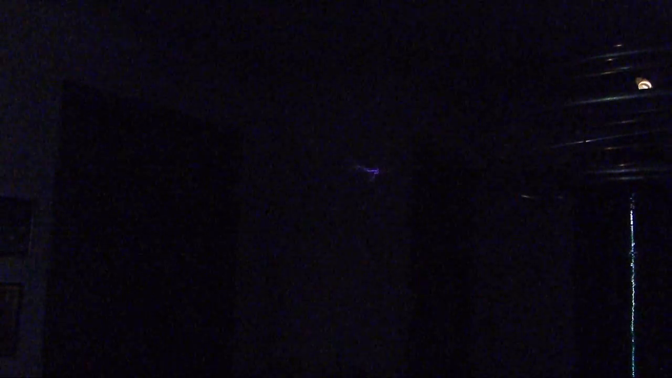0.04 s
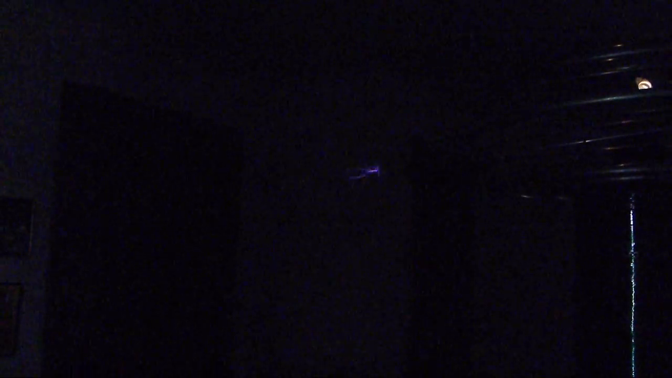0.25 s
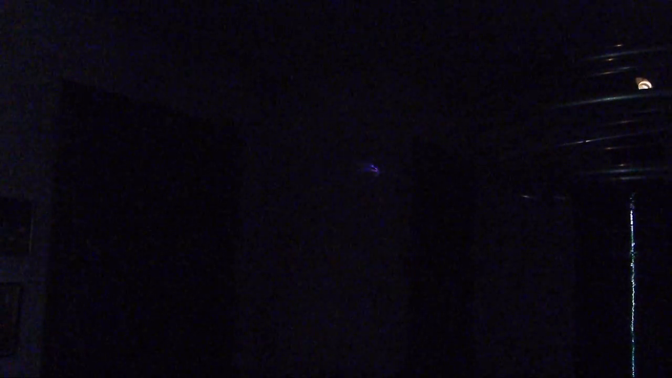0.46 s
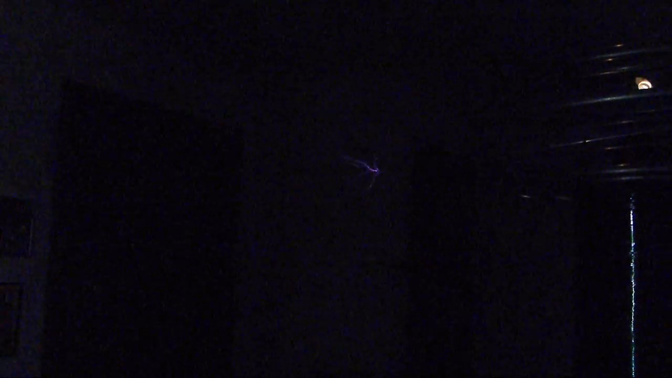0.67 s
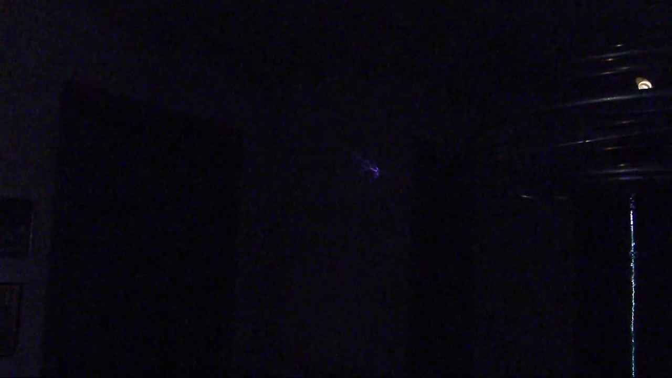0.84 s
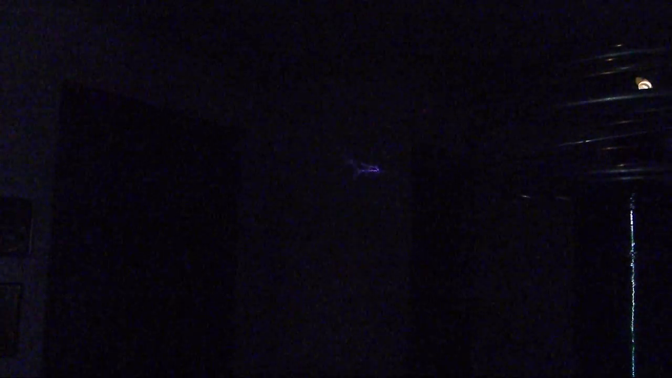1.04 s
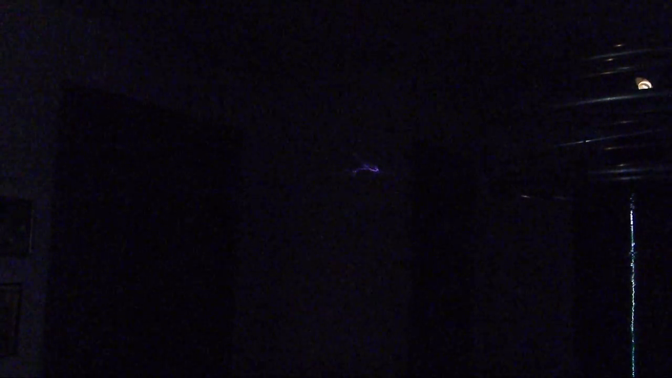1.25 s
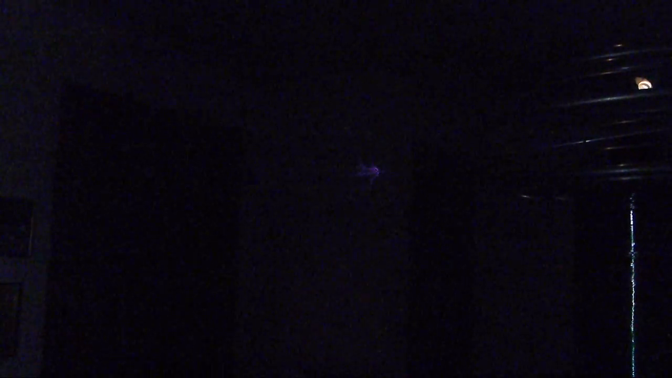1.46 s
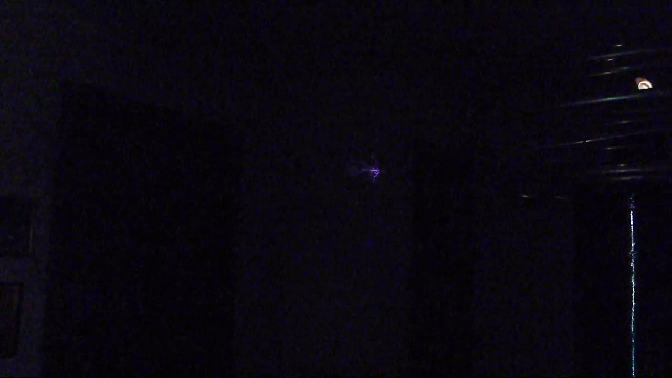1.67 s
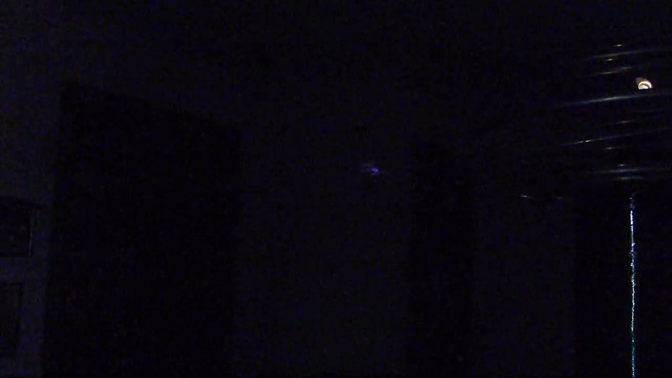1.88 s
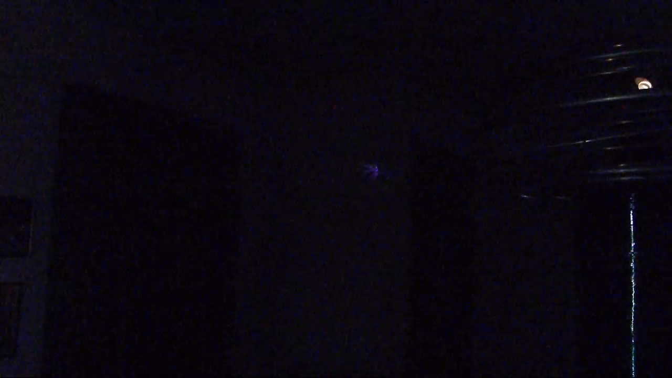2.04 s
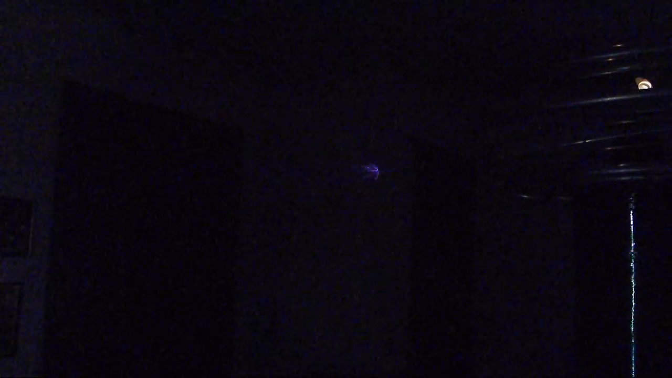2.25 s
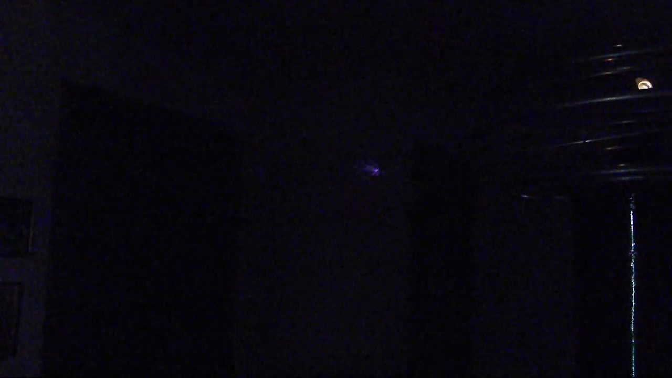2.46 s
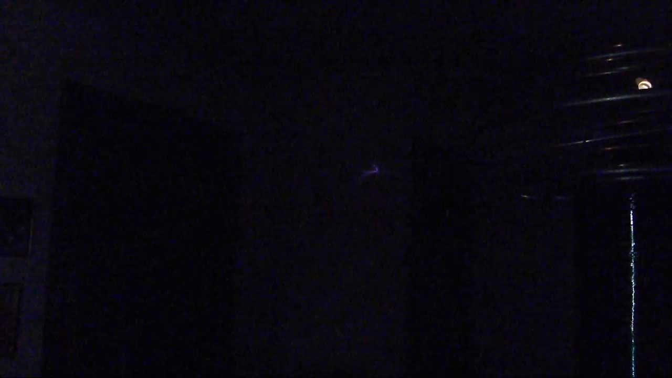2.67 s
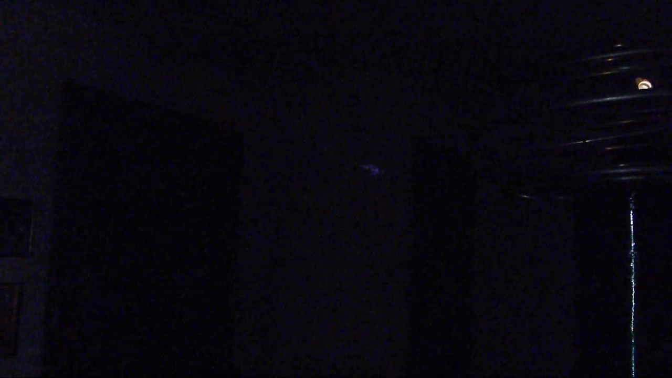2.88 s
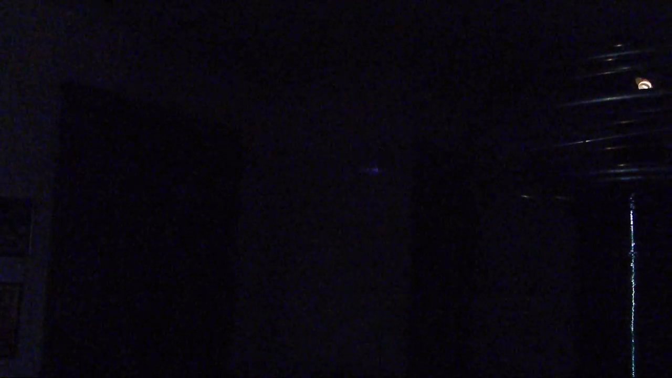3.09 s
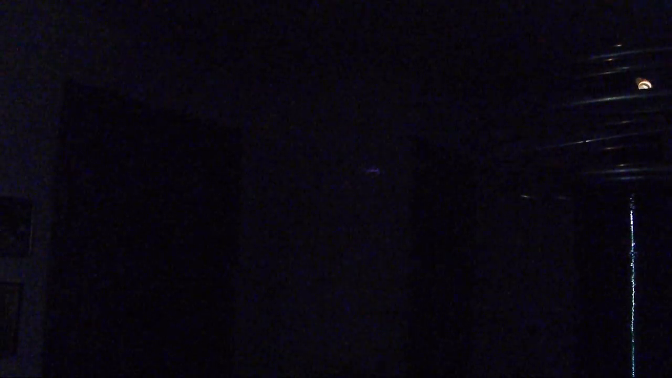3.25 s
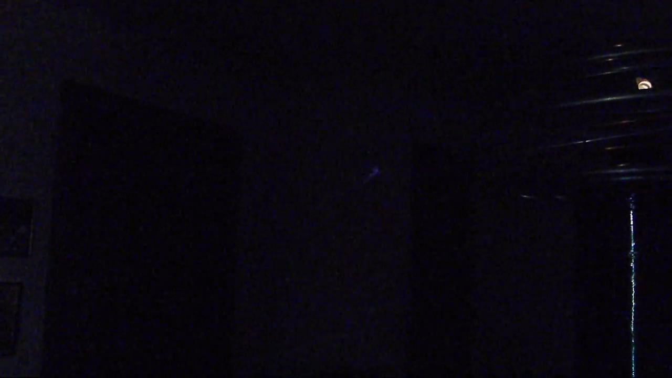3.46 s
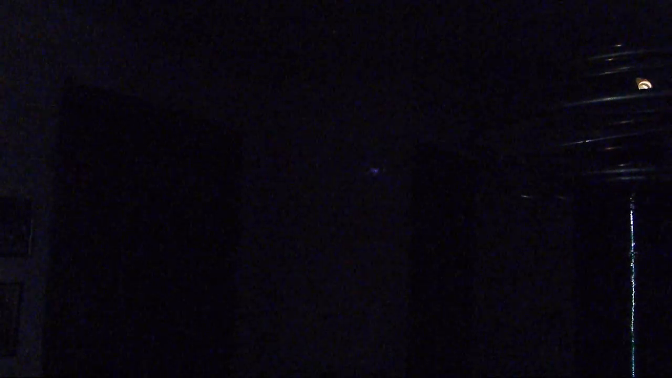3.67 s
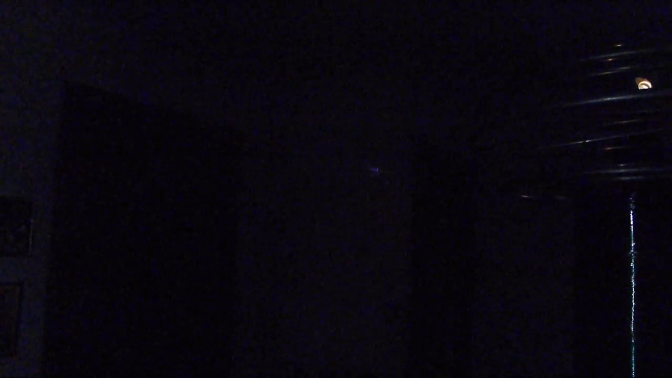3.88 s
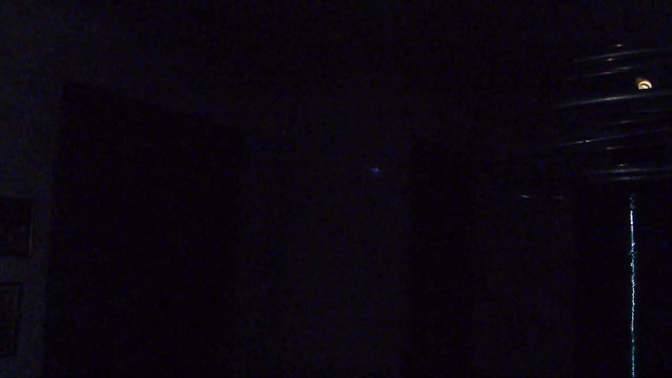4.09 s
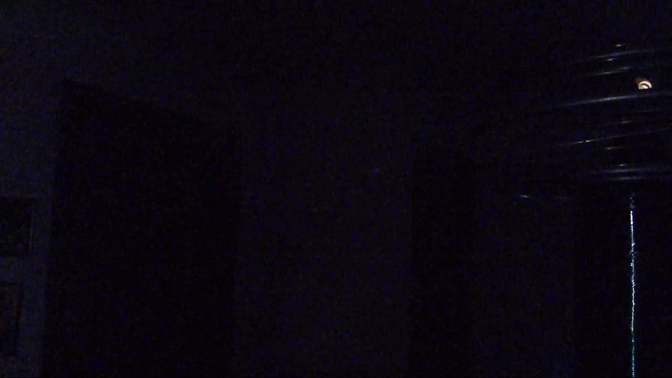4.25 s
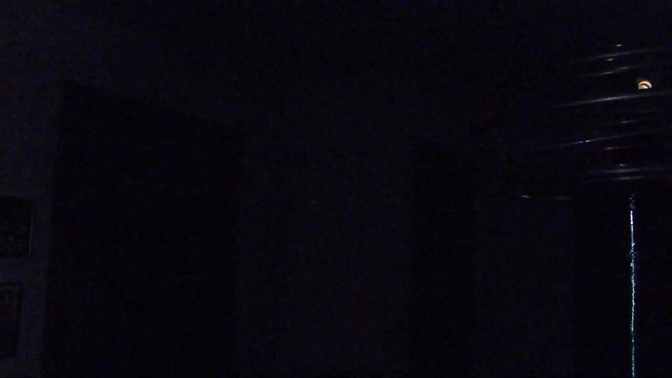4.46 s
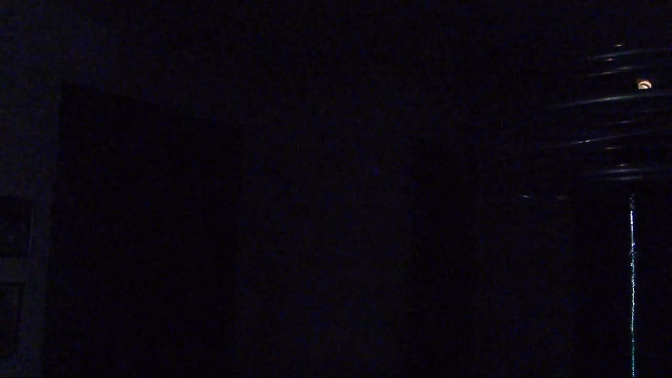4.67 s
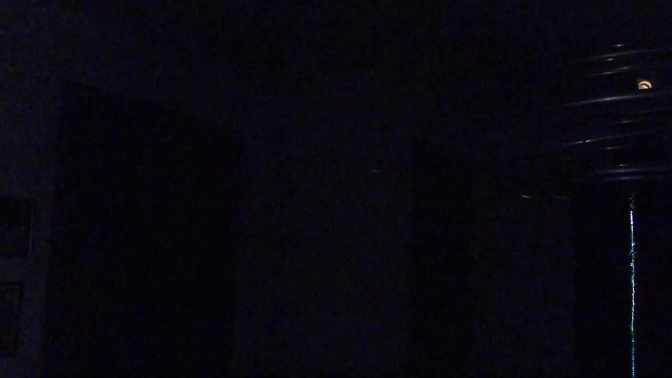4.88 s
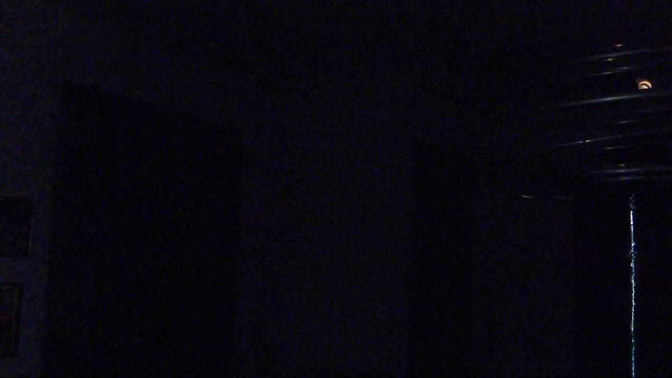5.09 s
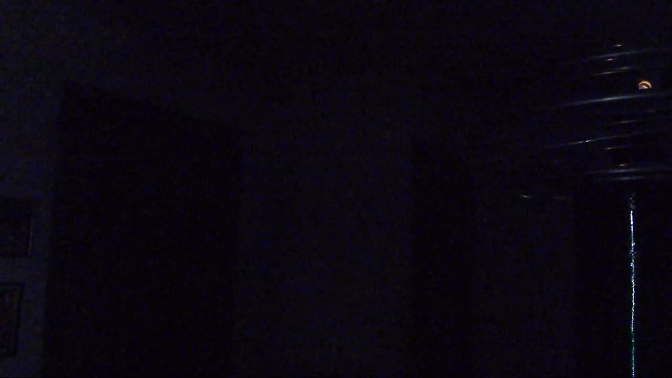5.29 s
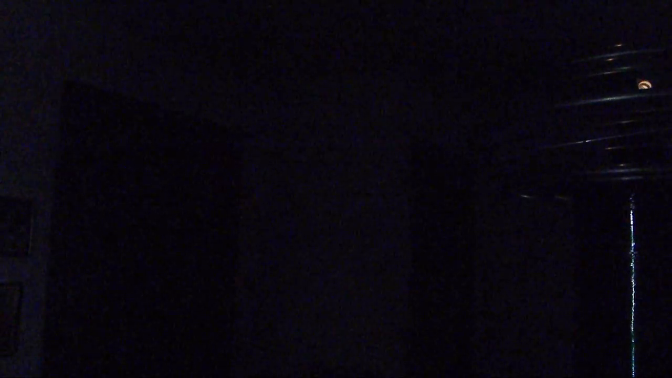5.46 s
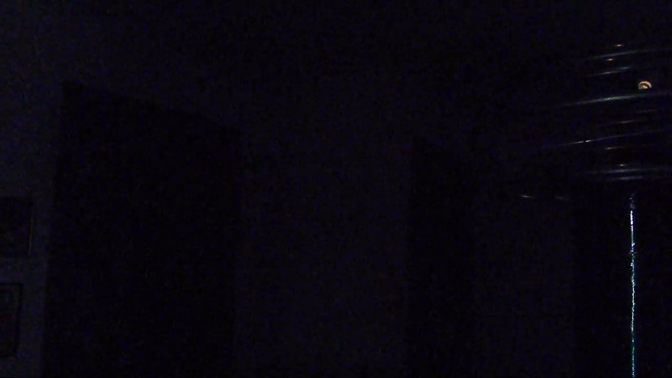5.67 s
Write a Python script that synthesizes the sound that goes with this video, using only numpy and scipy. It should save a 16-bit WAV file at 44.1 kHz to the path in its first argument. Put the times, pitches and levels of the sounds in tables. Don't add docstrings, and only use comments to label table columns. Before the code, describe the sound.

Continuous electric arcing buzz, dry and crackly, with a steady low rattling pitch. Loudness wavers for three seconds, loses some body, swells briefly, then falls away around 4.1 seconds; by five only faint ticking and irregular spark catches remain. Soft air noise and slight hum lie beneath. Indoors, hard walls, a small camera microphone with a thin, midrange-heavy sound.

```python
import sys
import numpy as np
from scipy import signal
from scipy.fft import rfft, irfft, next_fast_len
from scipy.io import wavfile
from scipy.ndimage import uniform_filter1d

SR = 44100
rng = np.random.default_rng(int(sys.argv[2]) if len(sys.argv) > 2 else 0)


def boost(x):
    u = np.asarray(x, float) / 20
    return 10 ** u


def dump(signal):
    limited = np.clip(np.atleast_2d(signal).T, -1, 1)
    pcm = np.round(limited * 32767).astype(np.int16)
    wavfile.write(sys.argv[1], SR, pcm)


N = 252693
SIZE = next_fast_len(N + SR)
FIRING_HZ = 68.64116


def firings():
    creep_hz_per_s, first_s = .003665, .009
    count = np.arange(-1, int(N / SR * FIRING_HZ) + 2)
    rate = np.sqrt(FIRING_HZ ** 2 + 2 * creep_hz_per_s * count)
    return (rate - FIRING_HZ) / creep_hz_per_s + first_s


def thump(train, knee_hz, damping_hz, suction_ms):
    rise_hz, suction = 592, .455
    standing_width_hz = 90
    # t/ms, level/dB
    echoes = [(0.663, 0.5), (2.149, 4.03), (2.91, -5.5), (3.814, 0.5), (4.197, -4.5), (5.072, -6.5),
              (5.372, -1.5), (6.148, 1.5), (6.686, -4), (7.805, -6.5), (8.684, 0), (11.706, 0),
              (12.558, -3), (14.149, -6.5)]
    # f/Hz, level/dB
    standing = [(412, -2), (471, 7.5), (549, 8), (602, -20), (675, 10.5), (765, -2), (892, 3), (1536, -15),
                (1613, 8), (2681, 9), (2986, 12), (3260, 15), (3586, 14), (3798, 1)]
    echo_paths = [(ms, boost(db)) for ms, db in echoes]
    modes = [(hz, standing_width_hz, db) for hz, db in standing]

    def response(s):
        expansion = s / (s + rise_hz) / (s * s + s * damping_hz + knee_hz ** 2)
        pulse = expansion * paths(s, [(0, 1), (suction_ms, -suction)])
        room = paths(s, echo_paths) * peaks(s, modes)
        return pulse * room * lead(s)

    return microphone(through(train, response))


def crackle(times, spark_db, column, spectrum, burst_ms, spread_db, room_db, t60, wall_hz):
    # t/ms, low level/dB, high level/dB
    arrivals = np.array([(.25, -21, -3), (2.15, 6, 2), (3.9, 5, 5.5), (6.1, -1.5, -12), (7.8, -15, -27),
                         (8.7, -4, -28), (11.2, -7, -23), (11.8, 3, -5), (12.8, 6, -30)])
    age = np.arange(48)
    delays = arrivals[:, 0] / 1000
    at = ((times[:, None] + delays + 1 / FIRING_HZ) * SR).astype(int)
    scatter_db = spread_db * rng.standard_normal(at.shape)
    sizes = boost(arrivals[:, column] + spark_db[:, None] + scatter_db)

    envelope = age * np.exp(-age / (burst_ms * SR / 1000))
    shape = envelope * rng.standard_normal(at.shape + age.shape)
    shape /= np.linalg.norm(shape, axis=2, keepdims=True)
    bursts = np.zeros(SIZE)
    np.add.at(bursts, at[..., None] + age, sizes[..., None] * shape)

    tail_samples = SR // 2
    decay = boost(-60 * np.arange(tail_samples) / SR / t60)
    tail = rng.standard_normal(tail_samples) * decay
    tail_response = boost(room_db) * rfft(tail / np.linalg.norm(tail), SIZE)

    def response(s):
        room = 1 + tail_response * wall_hz / (s + wall_hz)
        return at_hz(spectrum, s.imag) * room * lead(s)

    return through(bursts, response)


def stages(t):
    # t/s, low crackle level/dB and high crackle level/dB re thump, strength scatter/dB, shrinkage 0-1
    streamer = [
        (0, -0.5, -5, -1.3, 0.14),
        (.44, -4.5, -7.5, 0.4, 0),
        (2.85, -11.5, -7, -0.6, 0.6),
        (4.12, -21, -8, -0.7, 1),
        (5.03, -15.5, -4, -0.8, 0.82),
    ]
    half_turn_s = 0.032
    rows = np.array(streamer)
    share = np.clip((t[:, None] - rows[1:, 0]) / (2 * half_turn_s) + .5, 0, 1)
    return (rows[0, 1:] + share @ np.diff(rows[:, 1:], axis=0)).T


def extra_db(times, events):
    out = np.zeros(len(times))
    nearest = [np.argmin(abs(times - s)) for s, db in events]
    out[nearest] = [db for s, db in events]
    return out


def see_saw(count):
    return np.diff(rng.standard_normal(count + 1)) / np.sqrt(2)


def tick(times):
    # f/Hz, width/Hz, level/dB
    coil_rings = [(8700, 3900, 4.5), (5380, 2300, -21.5), (7230, 940, 10), (11650, 4700, 7),
                  (14500, 2600, -2), (8570, 390, 4)]

    def response(s):
        body = s * s / (s * s + s * 6600 + 4700 ** 2) / (s * s + s * 9000 + 6500 ** 2)
        return body * peaks(s, coil_rings) * paths(s, tick_paths()) * lead(s)

    return through(clicks(times, np.ones(len(times))), response)


def tick_paths():
    # t/ms, level/dB
    tick_arrivals = [(.3, -11), (2.2, -4), (3.9, -5), (11.8, -15)]
    spread_ms, scatter_db = 0.735, -1.5
    clusters = [(ms + spread_ms * rng.random(), boost(db) * rng.normal())
                for ms, db in tick_arrivals for part in range(9)]
    period_ms = 1000 / FIRING_HZ
    scatter = [(period_ms * rng.random(), boost(scatter_db) * rng.normal()) for path in range(30)]
    return clusters + scatter


def whine(times):
    hz, width_hz, level_db = 9200, 40, -45
    ring = lambda s: s / (s * s + s * width_hz + hz ** 2) * lead(s)
    return boost(level_db) * rms_one(through(clicks(times, np.ones(len(times))), ring))


def room_tone():
    # f/Hz, level/dB
    air_spectrum = [(25, -10.5), (70, -7), (120, -3.5), (200, -9), (400, -14.5), (1500, -12.5), (5500, -20),
                    (16000, -40)]
    # f/Hz, level/dB
    hum_lines = [(118.4, -73)]
    air_db, hum_trim_db = -54, -2.0
    t = np.arange(N) / SR
    air = rms_one(through(rng.standard_normal(N), lambda s: at_hz(air_spectrum, s.imag)))
    hum = sum(boost(db + hum_trim_db) * np.sin(2 * np.pi * hz * t) for hz, db in hum_lines)
    return boost(air_db) * air + hum


def microphone(x):
    # f/Hz, width/Hz, level/dB
    housing = [(4040, 180, -10.5), (6220, 1040, -17), (7800, 370, -12.5), (10180, 250, -14)]

    def response(s):
        first_bass_cut = (s * s / (s * s + s * 130 + 262 ** 2)) ** 2
        second_bass_cut = s * s / (s * s + s * 300 + 240 ** 2)
        return first_bass_cut * second_bass_cut * peaks(s, housing)

    return rms_one(through(x, response))


def clicks(times, sizes):
    at = (times + 1 / FIRING_HZ) * SR
    taps = np.floor(at)[:, None] + np.arange(-16, 17)
    offset = taps - at[:, None]
    window = np.cos(np.pi * offset / 34) ** 2
    out = np.zeros(SIZE)
    np.add.at(out, taps.astype(int), sizes[:, None] * np.sinc(offset) * window)
    return out


def lead(s):
    return np.exp(2 * np.pi * s / FIRING_HZ)


def paths(s, table):
    return sum(gain * np.exp(-2 * np.pi * s * ms / 1000) for ms, gain in table)


def peak(s, hz, width_hz, db):
    above = s * s + s * width_hz * boost(db / 2) + hz * hz
    below = s * s + s * width_hz / boost(db / 2) + hz * hz
    return above / below


def peaks(s, table):
    return np.prod([peak(s, *row) for row in table], axis=0)


def at_hz(points, hz):
    table = np.array(points)
    return boost(np.interp(np.log(hz), np.log(table[:, 0]), table[:, 1]))


def through(x, response):
    hz = np.arange(SIZE // 2 + 1) * SR / SIZE + 1e-3
    return irfft(rfft(x, SIZE) * response(1j * hz), SIZE)[:N]


def rms_one(x):
    return x / np.sqrt(np.mean(x ** 2) + 1e-20)


def scene():
    # t/s, level/dB
    drive = [(0, -25.5), (.2, -28), (.42, -28), (.45, -29.5), (.53, -27.5), (.56, -27.5), (1.2, -26),
             (1.75, -26.5), (2.38, -25.5), (2.45, -27), (2.73, -26), (2.97, -29), (3.86, -26),
             (4.12, -30.5), (4.23, -34), (4.51, -32), (5.0, -36.5)]
    # t/s, level/dB
    idle = (5.05, -40)
    # t/s, extra level/dB
    snaps = [(.169, 6.7), (.33, 5.4), (.417, 3.5), (.985, 4.1), (2.34, 4.9), (2.354, 5.8), (2.66, 3.5),
             (3.039, 4.1)]
    # t/s, extra level/dB
    sputters = [(5.093, 2.8), (5.151, 2), (5.195, 2.6), (5.282, 2.8), (5.297, 2.8), (5.311, 3),
                (5.326, 3.4), (5.399, 3), (5.413, 1.3), (5.501, 1.7), (5.573, 3.7), (5.588, 2),
                (5.646, 1.5), (5.704, 3.8)]
    # f/Hz, width/Hz, level/dB
    short_edge = (4680, 840, 10.2)
    # f/Hz, level/dB
    low_spectrum = [(200, -46), (800, -15), (1400, -10.5), (2200, 2.5), (3400, 3), (4700, -1.5), (6500, -2),
                    (9000, -17)]
    high_spectrum = [(3000, -38), (5500, -6), (7500, -2), (9500, -6), (12500, 0.5), (14000, -2),
                     (15700, -12)]

    times, t = firings(), np.arange(N) / SR
    thump_db = np.interp(t, *np.vstack([drive, idle]).T)
    low_db, high_db, _, shrunk = stages(t)
    scatter_db = stages(times)[2] * see_saw(len(times))
    catch_db, snap_db = extra_db(times, sputters), extra_db(times, snaps)

    train = clicks(times, boost(scatter_db + 1.27 * catch_db))
    long_push = thump(train, knee_hz=2100, damping_hz=1186, suction_ms=.274)
    short_push = thump(train, knee_hz=2000, damping_hz=716, suction_ms=.162)
    short_push = through(short_push, lambda s: peak(s, *short_edge))
    shrunk = np.clip(shrunk, 0, 1)
    push = (1 - shrunk) * long_push + shrunk * short_push

    restless_db = 4.1 * catch_db + .15 * snap_db + 0.69 * see_saw(len(times))
    low = crackle(times, restless_db, column=1, spectrum=low_spectrum, burst_ms=0.09,
                  spread_db=1.1, room_db=0.0, t60=0.28, wall_hz=8150)
    flicker_db = 0.7 * snap_db + 0.66 * catch_db + 1.3 * see_saw(len(times))
    high = crackle(times, flicker_db, column=2, spectrum=high_spectrum, burst_ms=0.094,
                   spread_db=0.4, room_db=0.5, t60=0.35, wall_hz=8650)
    streamer_noise = boost(low_db) * microphone(low) + boost(high_db) * microphone(high)
    spark = boost(thump_db) * (push + streamer_noise)

    lift = boost(-0.16 * (uniform_filter1d(thump_db, size=SR // 2) + 45))
    tick_db = -38.5
    background = boost(tick_db) * microphone(tick(times)) + whine(times) + room_tone()
    return (spark + lift * background)[None]


def band_limit(x):
    return signal.sosfilt(signal.butter(12, 15780, fs=SR, output="sos"), x)


def record(dry):
    top = signal.cheby2(16, 60, 16200, fs=SR, output="sos")
    mix = signal.sosfilt(top, dry)
    return band_limit(mix)


dry = scene()
out = record(dry)
dump(out)
```